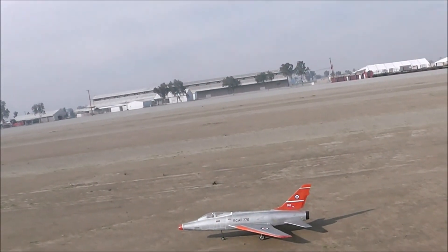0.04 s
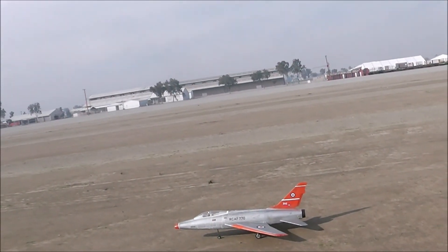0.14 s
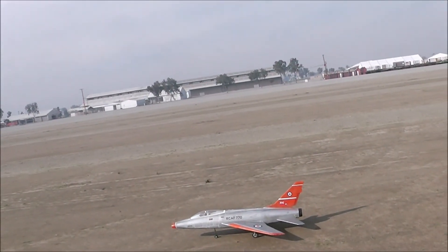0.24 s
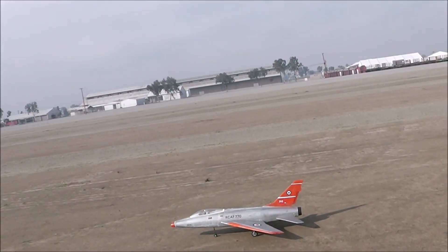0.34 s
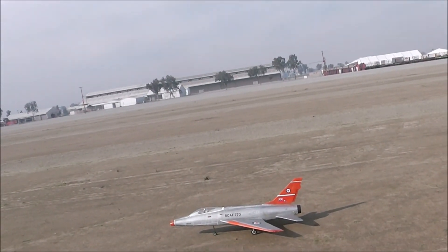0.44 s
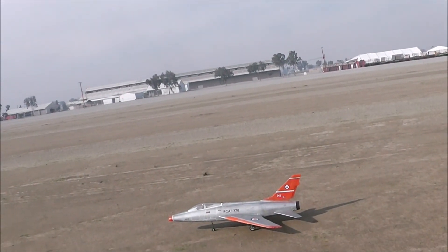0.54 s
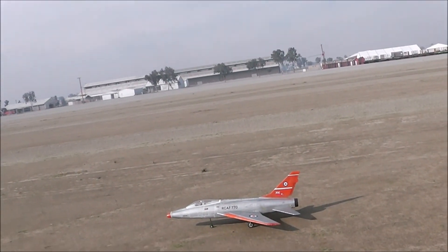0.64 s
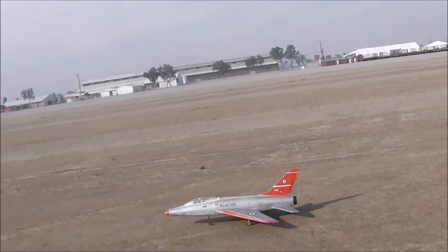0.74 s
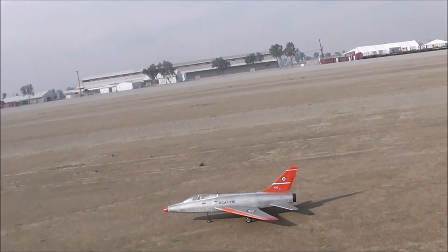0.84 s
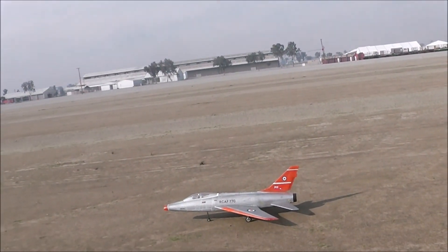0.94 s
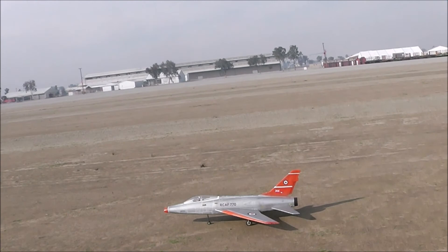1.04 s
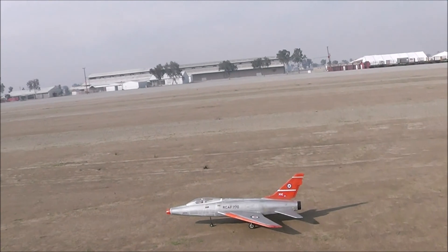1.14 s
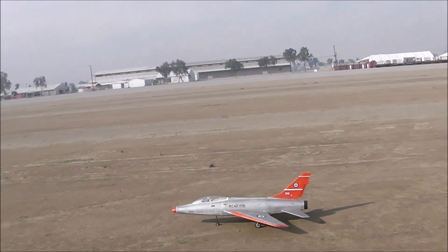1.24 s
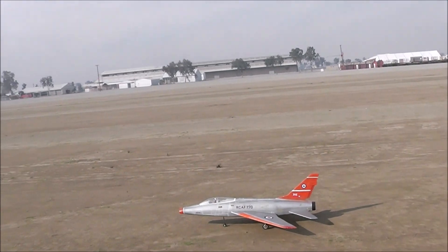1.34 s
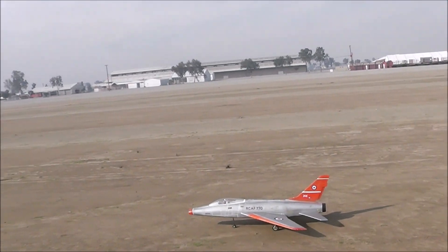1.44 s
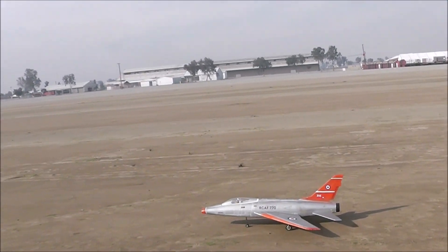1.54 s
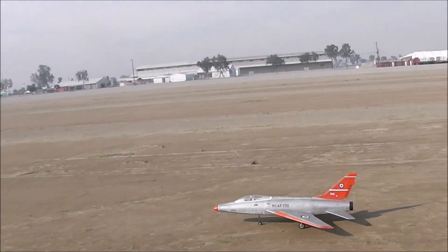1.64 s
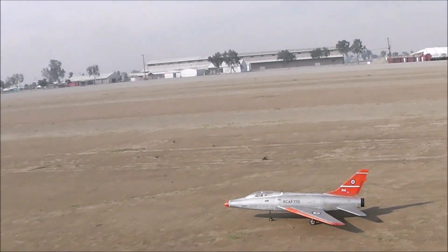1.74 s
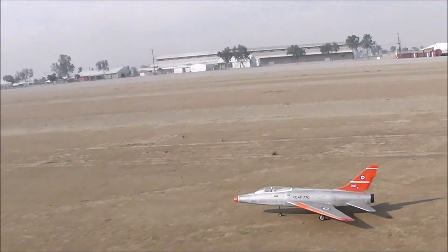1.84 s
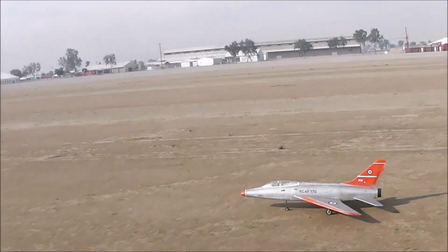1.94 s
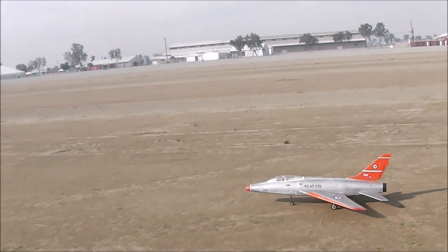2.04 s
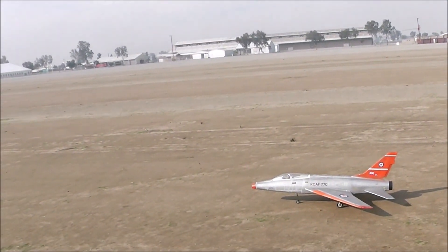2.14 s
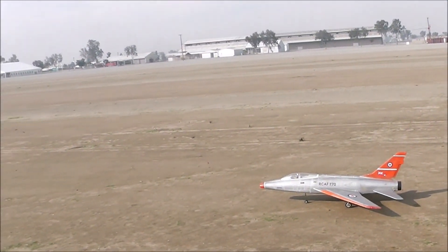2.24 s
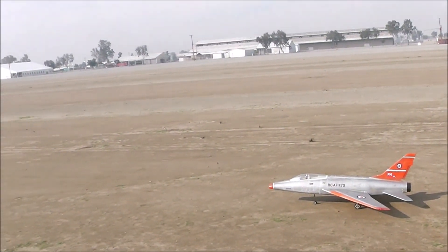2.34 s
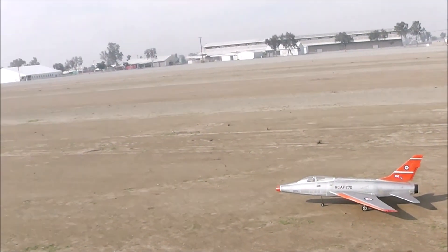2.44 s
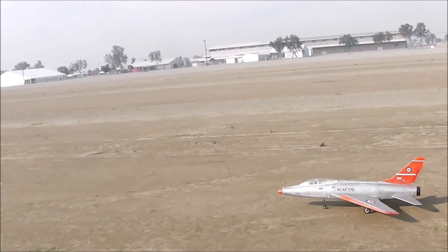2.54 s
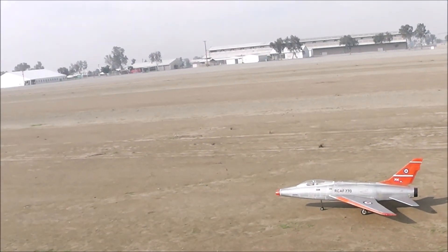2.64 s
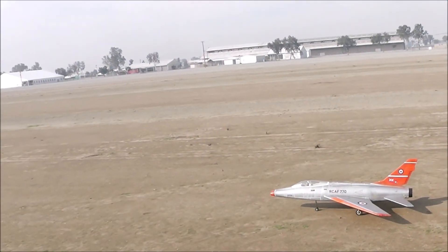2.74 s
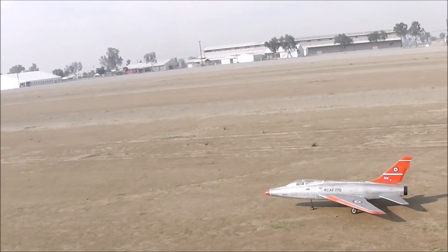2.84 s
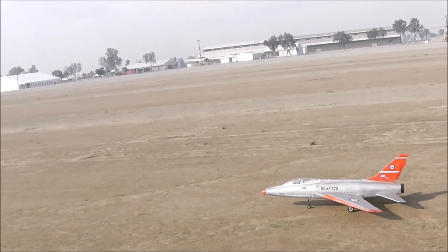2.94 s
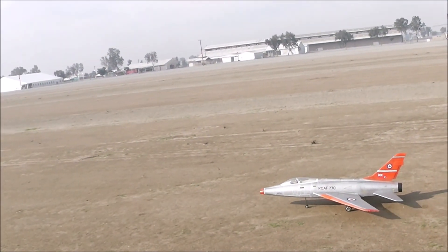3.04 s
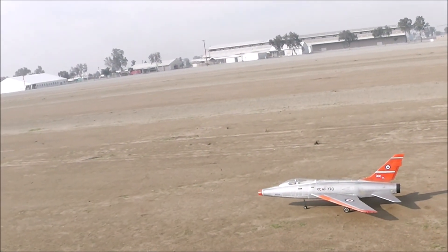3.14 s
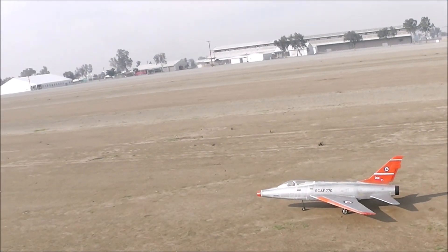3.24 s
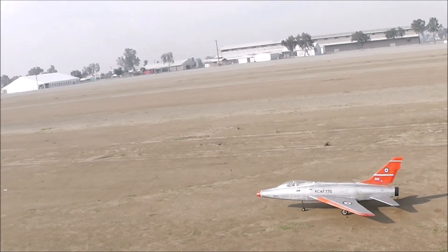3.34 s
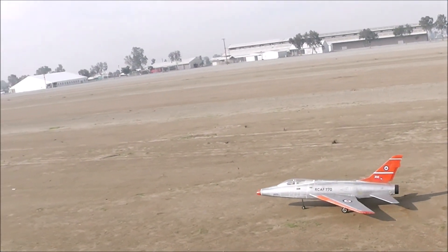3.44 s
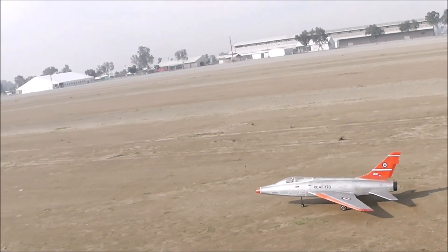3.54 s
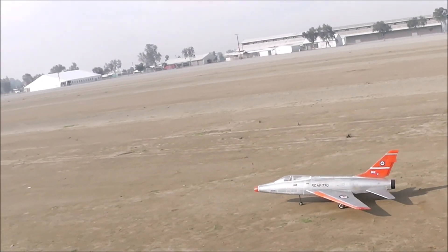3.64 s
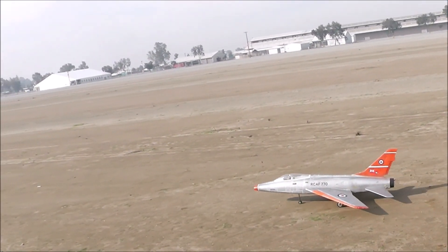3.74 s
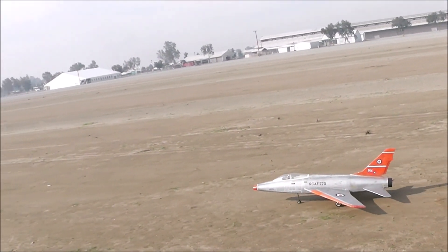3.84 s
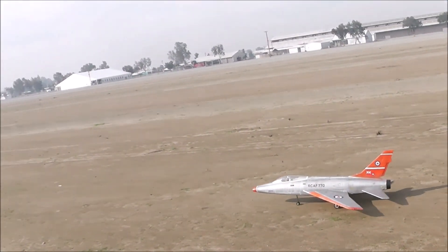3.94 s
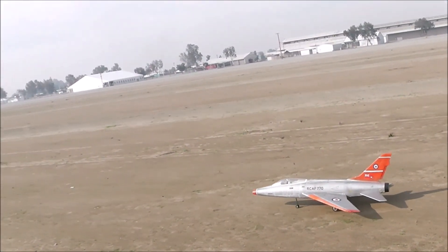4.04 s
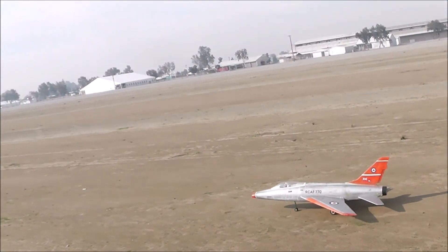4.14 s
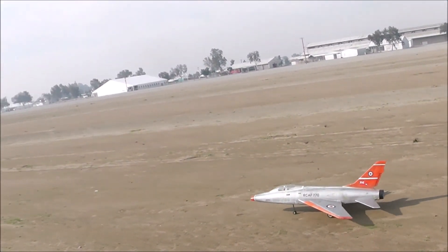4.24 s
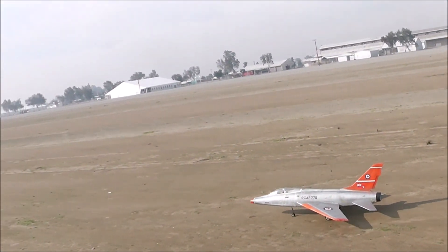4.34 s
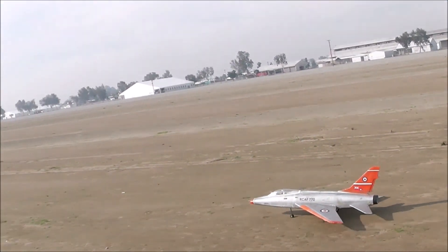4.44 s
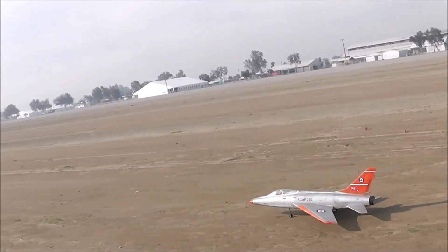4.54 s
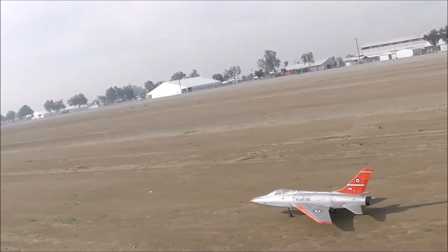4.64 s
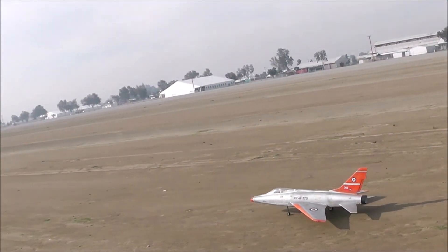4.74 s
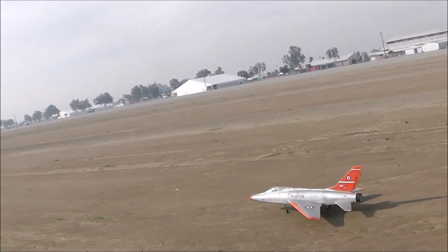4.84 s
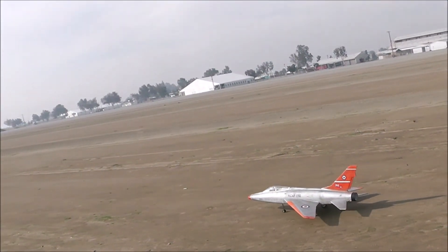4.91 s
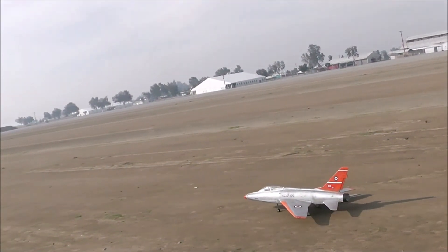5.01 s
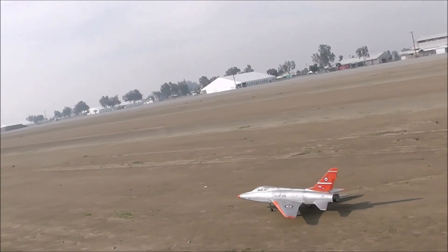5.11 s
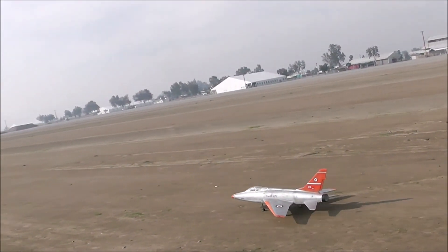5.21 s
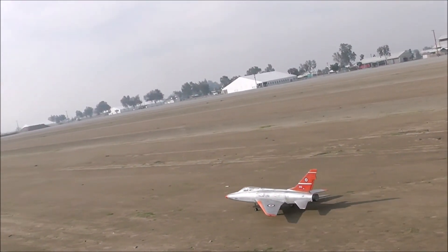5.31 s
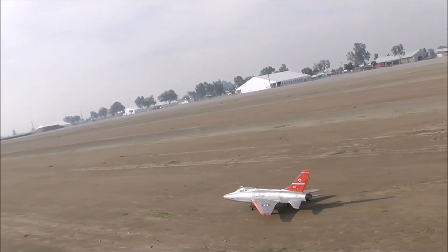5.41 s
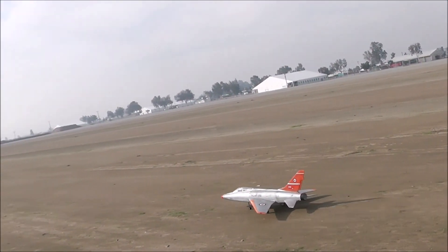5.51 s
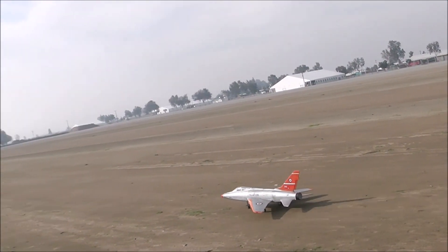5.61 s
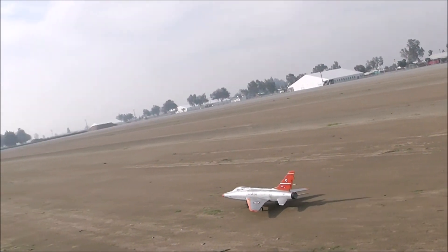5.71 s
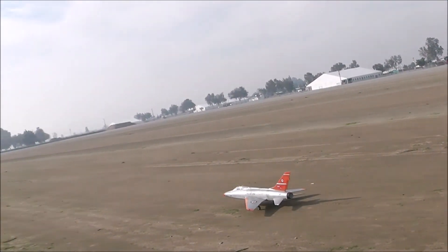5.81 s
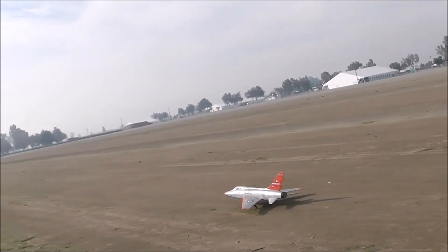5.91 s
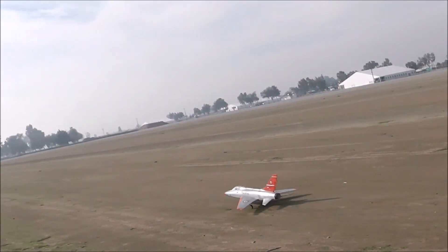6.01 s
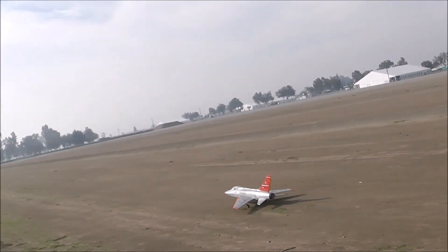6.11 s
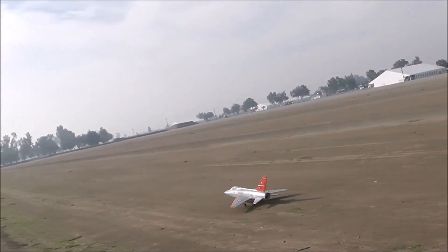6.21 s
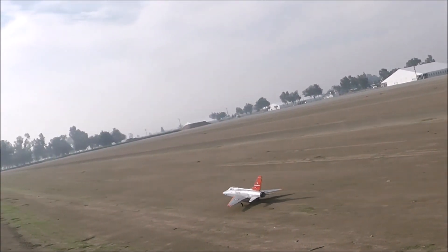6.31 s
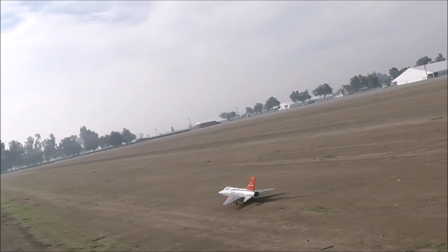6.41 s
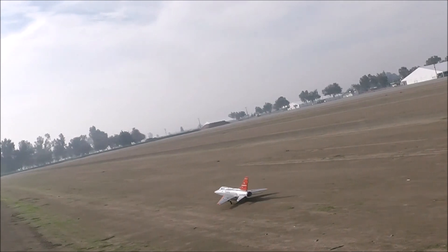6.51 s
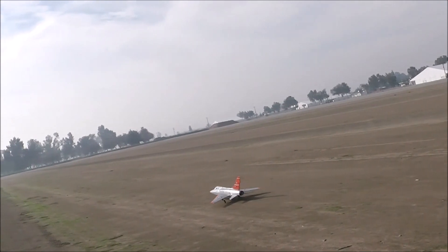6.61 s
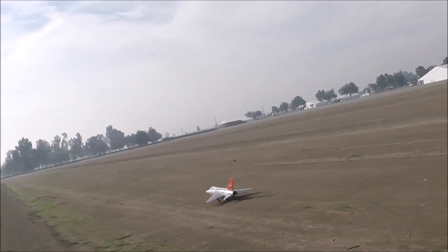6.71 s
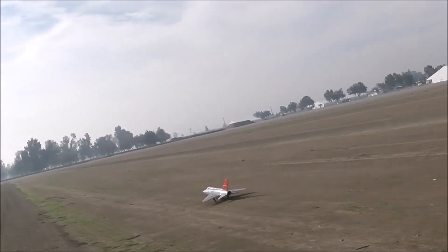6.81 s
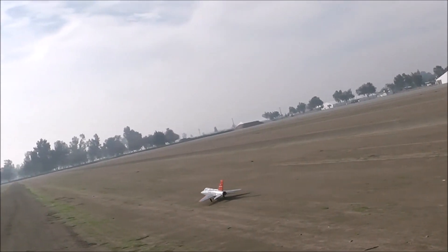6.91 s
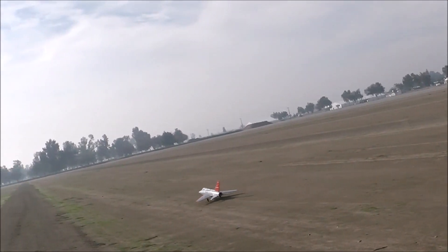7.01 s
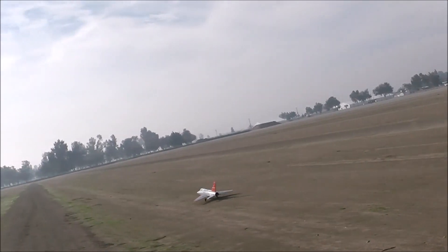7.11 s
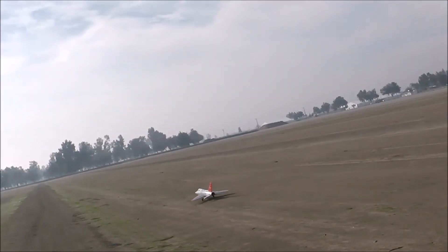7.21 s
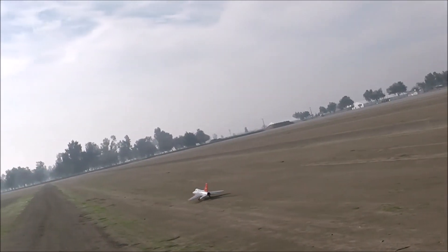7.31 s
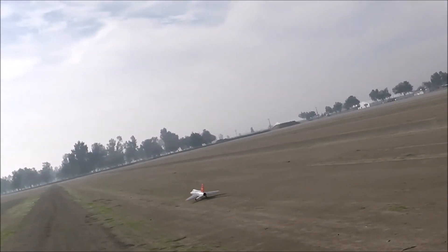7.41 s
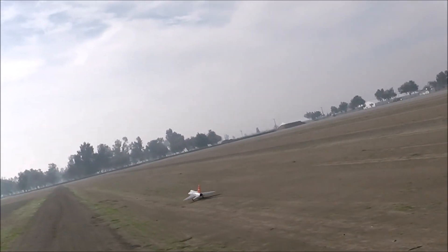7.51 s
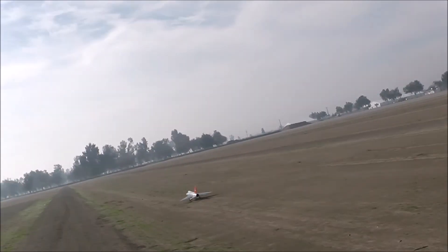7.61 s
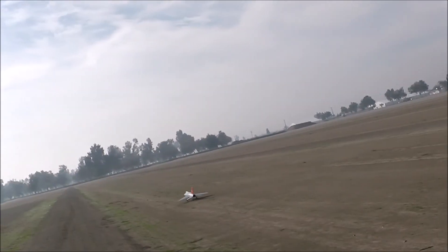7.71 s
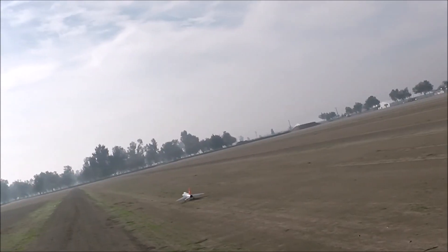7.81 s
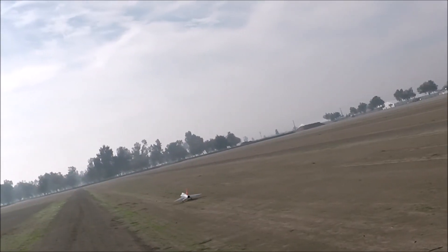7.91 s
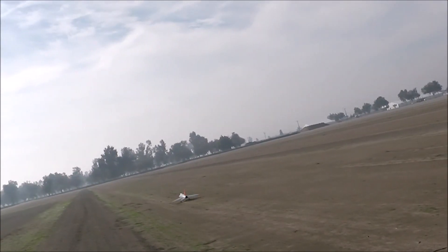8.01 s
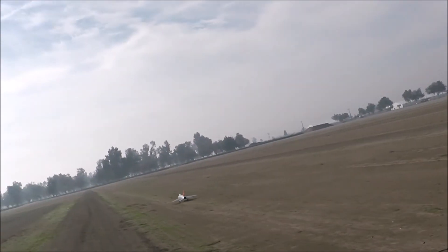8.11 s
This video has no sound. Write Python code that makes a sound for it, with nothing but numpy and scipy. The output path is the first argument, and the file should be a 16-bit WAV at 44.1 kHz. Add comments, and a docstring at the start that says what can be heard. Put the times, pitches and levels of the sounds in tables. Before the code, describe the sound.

Faint dry ticks and a tiny servo buzz sit over a distant outdoor rumble. A model jet's electric fan starts with a chirp and a brief growl, then climbs in steps with a hum, a fluttering whine and a hissing roar. The pitch jumps to high power, the rushing air drops back, and the tone darkens and fades as the jet rolls away from the microphone across an open field.

```python
"""An electric ducted-fan model jet spools up on a dirt field, rolls past and speeds away.
Dry ticks and a faint servo buzz open over a distant rumble. At one second the motor kicks in with a
chirp, a growl and a thin controller whistle. As the throttle steps up, the shaft hums, the twelve-blade
fan whines, the duct hisses and the exhaust roars. At five seconds air noise and rumble duck, and the
tail swings to the listener: the roar darkens, the blade wakes swell, and at last the hum fades."""
import sys
import numpy as np
from scipy import signal
from scipy.fft import rfft, irfft
from scipy.io import wavfile
from scipy.ndimage import map_coordinates

SR = 44100
rng = np.random.default_rng(int(sys.argv[2]) if len(sys.argv) > 2 else 0)


def wav_out(sig):
    """Save sig, one row per channel (or a flat mono array), as 16-bit PCM at SR to the path in sys.argv[1]."""
    wavfile.write(sys.argv[1], SR, np.round(np.clip(np.atleast_2d(sig).T, -1, 1) * 32767).astype(np.int16))


N = 359944
T = np.arange(N) / SR
FREQS = np.maximum(np.arange(N // 2 + 1) * SR / N, 1)
START_S = 1.096  # the rotor breaks loose
REF_HZ = 300  # shaft speed at which the speed-driven gains are 0 dB

# notches of the throttle stick: (time [s], target shaft speed [Hz])
THROTTLE = [(1.086, 147.6), (1.647, 193.2), (1.852, 198.4), (1.976, 217.6), (2.168, 227.5), (2.35, 232.4),
            (2.53, 244.6), (2.735, 255.2), (2.916, 262.6), (3.058, 276.4), (3.296, 291.7), (3.6, 290),
            (3.87, 301.5), (3.97, 298.6), (4.755, 316.7), (4.82, 336.6), (4.88, 370.4), (5.068, 389.5),
            (5.976, 405.7), (6.142, 416.4), (6.322, 425), (6.5, 430.3), (6.782, 439), (7.272, 444.4),
            (7.87, 450)]
# how the jet faces the listener: (time [s], view [0 side on, 1 rear quarter, 2 astern])
VIEW = [(0, 0.04), (4.75, 0.044), (5.2, 0.68), (5.8, 0.97), (6.35, 1.56), (6.8, 1.87), (7.3, 2.08),
        (8.16, 2.02)]
# fan whine: (time [s], blade tone [dB], 2nd harmonic [dB], 3rd harmonic [dB])
WHINE_LEVELS = [(1.25, -32, -72, -66), (1.72, -44.5, -43, -57.5), (1.95, -50, -45, -60),
                (2.3, -40, -38, -36), (2.7, -35, -30, -32.5), (3.2, -50, -31, -34), (3.5, -48, -43, -37),
                (3.78, -39, -34, -25.5), (4.0, -38, -23.5, -33), (4.2, -32, -29, -24.5),
                (4.4, -39.5, -32.5, -30), (4.85, -34, -20, -27), (5.05, -33.5, -22, -40),
                (5.5, -30.5, -43, -38), (5.9, -30, -22, -40), (6.3, -20, -25.5, -31),
                (6.6, -17, -29.5, -47), (6.82, -19, -25.5, -56), (7.2, -27.5, -34, -58),
                (7.36, -32.5, -25.5, -68), (7.8, -43, -28.5, -75), (8.12, -30.5, -43, -75)]
# sidebands from uneven blades: (shaft multiple [x], level relative to the hiss [dB])
SIDEBANDS = [(11, -14.5), (13, -15), (22, -11), (23, -10), (25, -11), (35, -19), (37, -23)]
# noise bands of the blade wakes: (shaft multiple [x], half width [Hz], relative level [dB])
WAKE_BANDS = [(12.78, 430, -2), (22.53, 720, 0)]
# once-a-turn hum: (time [s], level [dB])
HUM_LEVEL = [(1.28, -42), (1.62, -28), (1.75, -16.5), (2.01, -22), (2.2, -14.5), (2.47, -20.5), (2.65, -12),
             (3.15, -6.5), (3.5, -11), (3.88, -11), (4.0, -19.5), (4.65, -14), (4.83, -21.5), (4.95, -10),
             (5.5, -10), (5.93, -13.5), (6.1, -25.5), (6.3, -17.5), (6.5, -18.5), (6.6, -28), (6.75, -22.5),
             (8.15, -26.5)]
# drive into the airframe: (shaft multiple [x], side on [dB], rear quarter [dB], astern [dB], drop [dB])
OVERTONES = [(2, -6, -4, -17.5, -8.5), (3, -8.5, -5, 4, -21.5), (4, -7, -13.5, -18.5, -3),
             (5, -6.5, -28, -29, -8), (6, -4.5, -16, -18, -5), (7, -9, -24, -30, -14)]
# airframe resonances: (frequency [Hz], half width [Hz], gain [dB])
AIRFRAME_MODES = [(364, 8.2, -14), (438, 3, -19.5), (484, 11.3, -12), (529, 9.9, -15), (595.7, 6.5, -19),
                  (819, 38, -17.5), (1216, 84, -21), (1490, 23.6, -18.5), (1733, 62, -26.5),
                  (2085, 20, -27)]
# partials of the cogging growl: (shaft multiple [x], relative level [dB])
COG_PARTIALS = [(3, -0.5), (6, -4.5), (7, -24), (8, -6), (9, 1.5), (10, -5)]
# colour of the exhaust roar: (frequency [Hz], side on [dB], rear quarter [dB], astern [dB])
ROAR_COLOUR = [(100, -11, -12, -17), (217, -0.5, -8, -8), (385, 4.5, 6, -4.5), (713, -2.5, -4.5, -3.5),
               (1296, 2.5, -5, 1), (1580, -3.5, -5, -2), (1903, -9, -17.5, -11), (2300, -15, -23.5, -23.5),
               (2900, -33.5, -35, -28.5), (5000, -37, -54, -43)]
# colour of the duct hiss: (frequency [Hz], side on [dB], rear quarter [dB], astern [dB])
HISS_COLOUR = [(2320, -4, -34, -37), (3290, -9, -29, -32), (3734, -1, -2, -6), (4330, -2.5, -7, -2.5),
               (5400, 2, -8, 4.5), (5800, 1, 0.5, 0), (7850, 1, 2, 2), (9000, 3.5, 1, -2.5),
               (10600, 2, 0, 2), (12660, -9, -7, -8.5), (15800, -12, -8, -10)]
# roar and hiss duck sharply at five seconds, then the hiss fades away:
# (time [s], roar gain [dB], hiss gain [dB])
AIR_FADERS = [(1.3, 2.5, 1.5), (1.9, 0, 3), (2.7, 1.7, 2), (3.5, -2.5, 0), (4.1, .5, 0.7), (4.8, 1.5, 1.3),
              (5.05, -10, -6.5), (5.6, -7, -3.5), (6.1, -9, -7), (6.6, -9.5, -9.5), (6.8, -6.3, -7),
              (7.3, -5, -10), (8.15, -8, -16)]
# starting kicks of the motor: (time [s], length [s], pitch [Hz], peak [dB])
KICKS = [(1.066, 0.009, 373, -14.5), (1.082, 0.033, 412, -19.5), (1.114, .026, 370, -18.5),
         (1.141, 0.034, 433, -23)]
# switching whistle of the controller: (time [s], level [dB])
WHISTLE_LEVEL = [(1.06, -100), (1.07, -52), (1.2, -43), (2.3, -52), (2.7, -37), (3.1, -52), (4.6, -47),
                 (5.1, -90)]
# dry ticks up to the start: (time [s], level [dB])
TICKS = [(0.0313, -49), (0.384, -33.5), (0.4304, -42), (0.4524, -45), (0.473, -41), (0.496, -39),
         (0.6325, -41), (0.6557, -41), (0.7437, -44), (0.7672, -34.5), (0.7881, -41), (0.834, -35),
         (1.0638, -38), (1.098, -39)]
# colour of the ticks: (frequency [Hz], relative level [dB])
TICK_COLOUR = [(500, -3), (1500, 8), (2900, -16), (4000, -6), (5800, -5.5), (8000, -14), (13000, -21),
               (16000, -18)]
# colour of the rumble over open ground: (frequency [Hz], relative level [dB])
RUMBLE_COLOUR = [(25, -11), (55, -1.5), (95, 1.5), (150, -8), (250, -13), (500, -20.5), (800, -20),
                 (1250, -23), (1700, -36.5), (2400, -48), (3200, -56), (5600, -48.5), (8000, -57),
                 (11000, -54), (15000, -62)]
# the rumble ducks while the jet is loudest and recovers afterwards: (time [s], gain [dB])
RUMBLE_FADER = [(0, -1.5), (.6, 1), (2, 4), (3.5, 1.5), (4.7, 2), (5.1, -8.5), (6.2, -9), (6.8, -2.5),
                (8.16, 2)]
# microphone pair, jet side on: (frequency [Hz], left minus right [dB], phase lead of the left [rad])
MIC_SHADING = [(100, -.3, 0.033), (900, -1.4, 0.1), (2440, .5, 0), (3200, 0, 0), (4130, -4, 0),
               (4930, -2.4, -0.49), (8400, -3.2, -0.21), (10400, -7, -0.66), (11200, -19, 0),
               (12400, -2, 1.9), (14000, -1, 1.6), (15800, 4, 1.5)]


def fan(angle, hiss_db, rear_quarter, blades=12):
    """Blades chop uneven inflow: a fluttering whine on a noise skirt, with sidebands behind the wing."""
    out = np.zeros(N)
    for k, db in enumerate(curves(WHINE_LEVELS), 1):
        phase = k * blades * angle
        out += tone(phase, db + 3 * wander(3.3), rough=0.15, flutter_hz=26)
        out += undb(db - 16) * wander(170) * np.sin(phase)  # skirt
    for k, db in SIDEBANDS:
        out += (0.16 + 0.63 * rear_quarter) * tone(k * angle, hiss_db + db, rough=0.96, flutter_hz=56)
    return out


def wake(angle, peak_s=6.01, width_s=0.6, level_db=-24.5):
    """Turbulent wakes smear the whine into bands of noise, in one swell as the tail swings round."""
    swell = np.exp(-((T - peak_s) / width_s) ** 2)
    bands = sum(undb(level_db + db) * wander(hz) * np.sin(k * angle) for k, hz, db in WAKE_BANDS)
    return np.sqrt(2) * swell * bands


def shaft_hum(angle, roar_db, side_on):
    """Rotor unbalance hums once a turn; gulped turbulent air makes it flutter while side on."""
    hum_db, = curves(HUM_LEVEL)
    hum = tone(angle, hum_db, rough=0.067, flutter_hz=13)
    flutter = side_on * undb(roar_db - 6) * wander(20) * np.sin(angle)
    return hum + flutter


def airframe(angle, speed, view_mix, drop_s=6.53, drop_length_s=0.038):
    """The shaft's overtones sweep through the airframe's resonances and fall away late in the run."""
    shake_db = 41 * decades(speed, REF_HZ)  # about the square of the speed
    dropped = np.clip((T - drop_s) / drop_length_s, 0, 1)
    rough = 0.16 + 0.2 * view_mix[0]  # gulped air adds flutter while side on
    out = np.zeros(N)
    for k, *view_db, drop_db in OVERTONES:
        ring_power = sum(undb(db) ** 2 / (1 + ((k * speed - hz) / width) ** 2)
                         for hz, width, db in AIRFRAME_MODES)
        drive_db = shake_db + np.dot(view_db, view_mix) + drop_db * dropped + 1.07 * wander(4)
        out += np.sqrt(ring_power) * tone(k * angle, drive_db, rough, flutter_hz=24)
    return out


def cogging(angle, speed, top_hz=173):
    """The magnets growl at low speed, louder under starting torque, and fade out above top_hz."""
    growl_db = -31.5 + 51 * decades(speed, top_hz) + 15 * start_decay(0.043)
    fade = 1 / (1 + (speed / top_hz) ** 24)
    return fade * sum(tone(k * angle, growl_db + db, rough=0.45, flutter_hz=17) for k, db in COG_PARTIALS)


def spool(lag_turns=12):
    """Shaft speed in Hz: the rotor glides to each throttle notch, sooner the faster it turns."""
    speed, previous_hz = np.zeros(N), 0
    for s, hz in THROTTLE:
        speed += (hz - previous_hz) * (1 - np.exp(-np.maximum(T - s, 0) * hz / lag_turns))
        previous_hz = hz
    return speed


def stutter():
    """Gain of the rotor: it starts with a stutter that settles as the controller locks on."""
    fade_in = np.clip((T - START_S) / 0.01, 0, 1)
    depth_db = 0.5 + 3 * start_decay(0.28)
    return fade_in * undb(depth_db * (1.5 * np.tanh(wander(70)) - 0.5))


def airflow(colours, view_mix, db, flutter_db):
    """Turbulent air, its colour crossfading with the side from which the jet is heard."""
    air = sum(np.sqrt(share) * noise(colour) for share, colour in zip(view_mix, spectra(colours)))
    return air * undb(db + flutter_db * wander(18))


def air_levels(speed):
    """Roar and hiss in dB: both build with shaft speed and duck at five seconds, then the hiss fades."""
    roar_fader_db, hiss_fader_db = curves(AIR_FADERS)
    roar = undb(-20 + 49 * decades(speed, REF_HZ) + roar_fader_db)
    rasp = undb(-30) * start_decay(0.11)  # the rotor breaking loose
    hiss_db = -23.5 + 60 * decades(speed, REF_HZ) + hiss_fader_db
    return 20 * np.log10(np.hypot(roar, rasp)), hiss_db


def controller(switch_hz=11900):
    """The controller kicks the rotor into motion and whistles while it chops the current."""
    whistle_db, = curves(WHISTLE_LEVEL)
    out = tone(2 * np.pi * switch_hz * T, whistle_db, rough=0.18, flutter_hz=30)
    for s, length, hz, db in KICKS:
        progress = np.clip((T - s) / length, 0, 1)
        arch = np.sqrt(4 * progress * (1 - progress))
        out += undb(db) * arch * np.sin(2 * np.pi * hz * (T - s))
    return out


def ground_echo(direct, view, shrink_per_s=0.4):
    """The echo off the dirt closes in on the direct sound as the jet leaves: a rising flange."""
    lag_s = 0.00021 * np.exp(-shrink_per_s * (T - 5.8))
    echo = map_coordinates(direct, [(T - lag_s) * SR], mode="mirror")
    gain = 0.19 * np.minimum(view, 1)
    return (direct + gain * echo) / np.sqrt(1 + gain ** 2)


def ground_scatter(roar_db):
    """The ground scatters the roar into a diffuse midrange wash."""
    colour, = spectra([(100, -2), (500, -11), (1150, 12), (1700, 9), (2500, -30), (6000, -60)])
    return noise(colour) * undb(roar_db - 27.5)


def mic_shading(jet, hiss_db, view, astern_share=0.24):
    """Side signal: the housing shades the left microphone, less as the jet moves straight ahead."""
    balance_db, lead = spectra(MIC_SHADING)
    left_over_right = undb(balance_db) * np.exp(1j * lead)
    shade = irfft(rfft(jet) * (left_over_right - 1) / (left_over_right + 1), N)
    # the highest hiss scatters and reaches the two microphones unrelated
    colour, = spectra([(3500, -78), (5000, -23), (9500, -4), (11200, 17), (12500, 8), (16000, 0)])
    scatter = noise(colour) * undb(hiss_db - 13)
    off_axis = 1 - (1 - astern_share) * view / 2
    return off_axis * (shade + scatter)


def ticks(decay_s=0.0033):
    """Tiny dry clicks, each a noise burst that dies within milliseconds."""
    bursts = sum(undb(db) * (T >= s) * np.exp(-np.abs(T - s) / decay_s) for s, db in TICKS)
    return bursts * noise(spectra(TICK_COLOUR)[0])


def servo(start_s=0.68, stop_s=1.1, pulse_hz=60, ring_hz=3550, db=-51):
    """A control servo buzzes faintly as it holds its position."""
    cycle = (T - start_s) * pulse_hz % 1
    pulses = np.exp(-cycle / 0.089) * (T > start_s) * (T < stop_s)
    return undb(db) * pulses * (1 + 0.46 * wander(250)) * np.sin(2 * np.pi * ring_hz * T)


def rumble(level_db=-32):
    """A bed of distant rumble over open ground."""
    fader_db, = curves(RUMBLE_FADER)
    return noise(spectra(RUMBLE_COLOUR)[0]) * undb(level_db + fader_db + 0.48 * wander(8))


def breeze(level_db=-52.5):
    """A slight breeze with a faint hiss on top."""
    colour = [(30, -1.5), (120, -23), (1000, -17), (2500, -40), (6000, -35), (11000, -38), (15000, -51)]
    return noise(spectra(colour)[0]) * undb(level_db)


def undb(db):
    """Decibels to gain."""
    return 10 ** (np.asarray(db) / 20)


def curves(table):
    """An envelope for each column of a time table, joined by straight lines."""
    s, *columns = np.transpose(table)
    return [np.interp(T, s, column) for column in columns]


def spectra(table):
    """An EQ curve for each column of a frequency table, joined on a log axis."""
    hz, *columns = np.transpose(table)
    return [np.interp(np.log(FREQS), np.log(hz), column) for column in columns]


def noise(colour_db):
    """Noise shaped by an EQ curve, at rms 1."""
    shaped = irfft(rfft(rng.standard_normal(N)) * undb(colour_db), N)
    return shaped / shaped.std()


def wander(rate_hz):
    """A random modulator of spread 1, with little motion above rate_hz."""
    return noise(-10 * np.log10(1 + (FREQS / rate_hz) ** 4))


def tone(phase, db, rough, flutter_hz):
    """A sine whose level and phase are shaken by turbulence."""
    shaken = (1 + rough * wander(flutter_hz)) * np.sin(phase) + rough * wander(flutter_hz) * np.cos(phase)
    return undb(db) * shaken * np.sqrt(2 / (1 + 2 * rough ** 2))


def decades(speed, ref_hz):
    """Shaft speed as powers of ten above a reference."""
    return np.log10(np.maximum(speed, 1) / ref_hz)


def start_decay(decay_s):
    """An envelope that jumps to 1 as the rotor starts, then dies away."""
    age = T - START_S
    return (age >= 0) * np.exp(-np.abs(age) / decay_s)


def scene():
    """The jet over the field, mixed as mid and side for two closely spaced microphones."""
    speed = spool()
    angle = 2 * np.pi * np.cumsum(speed * (1 + 0.00054 * wander(13.8))) / SR
    view, = curves(VIEW)
    view_mix = [np.maximum(1 - np.abs(view - k), 0) for k in range(3)]
    side_on, rear_quarter, _ = view_mix
    roar_db, hiss_db = air_levels(speed)
    roar = airflow(ROAR_COLOUR, view_mix, roar_db, flutter_db=0.72)
    # from the rear quarter the wakes take over part of the hiss
    hiss = airflow(HISS_COLOUR, view_mix, hiss_db - 3.1 * rear_quarter, flutter_db=0.9)
    rotor_gain = stutter()
    motor = shaft_hum(angle, roar_db, side_on) + airframe(angle, speed, view_mix) + cogging(angle, speed)
    rotor = rotor_gain * (motor + fan(angle, hiss_db, rear_quarter) + wake(angle))
    jet = rotor + roar + ground_echo(hiss, view) + controller()
    mid = jet + ticks() + servo() + rumble()
    side = breeze() + ground_scatter(roar_db) + mic_shading(jet, hiss_db, view)
    return np.array([mid + side, mid - side])


def record(dry, top_hz=15850):
    """Peaks are held at full scale, then a steep low-pass cuts the top."""
    lowpass = signal.ellip(10, 0.1, 80, top_hz, fs=SR, output="sos")
    return signal.sosfilt(lowpass, np.clip(dry, -1, 1))


dry = scene()
out = record(dry)
wav_out(out)
```